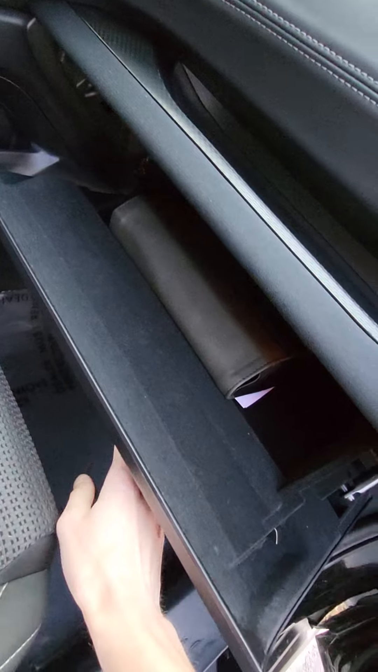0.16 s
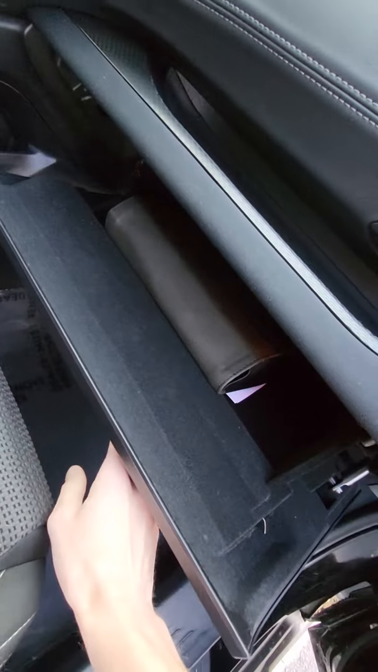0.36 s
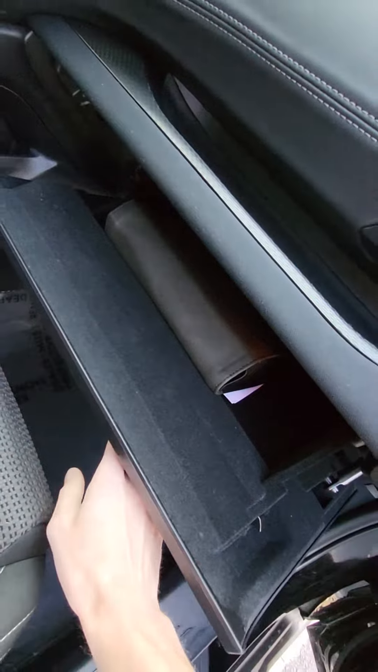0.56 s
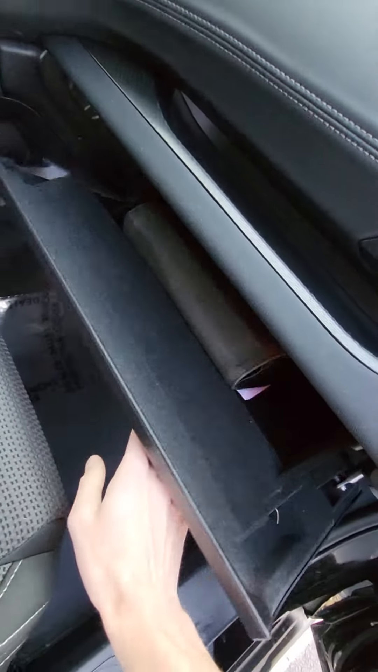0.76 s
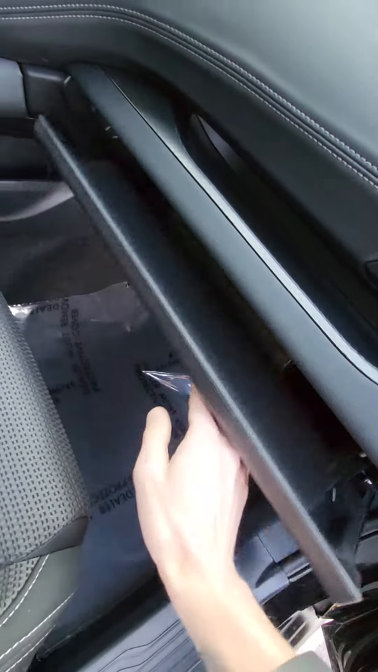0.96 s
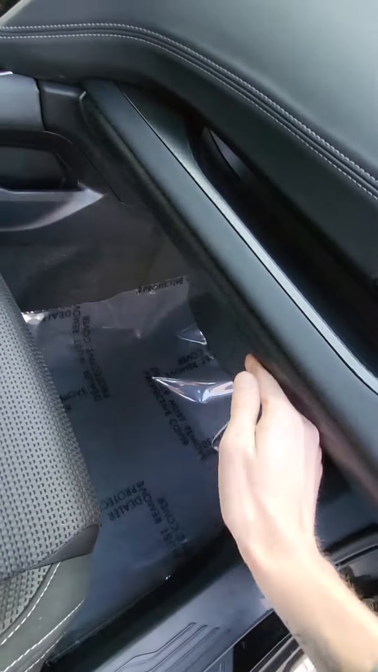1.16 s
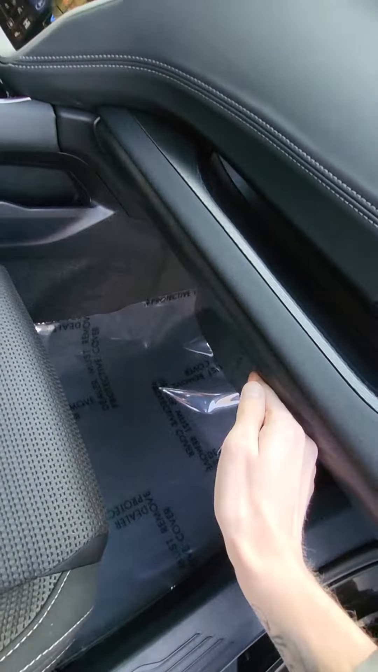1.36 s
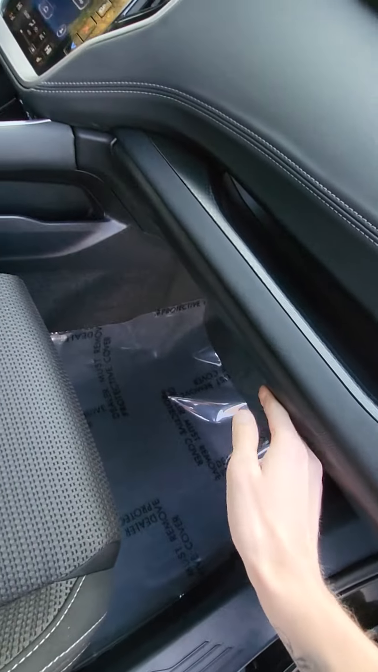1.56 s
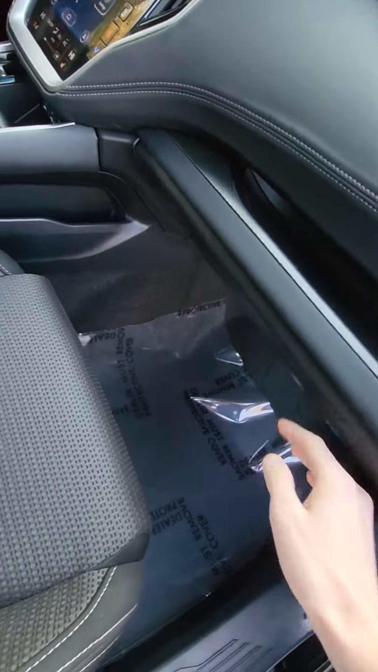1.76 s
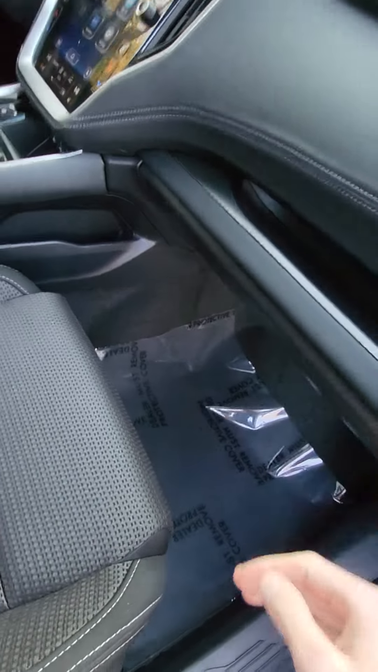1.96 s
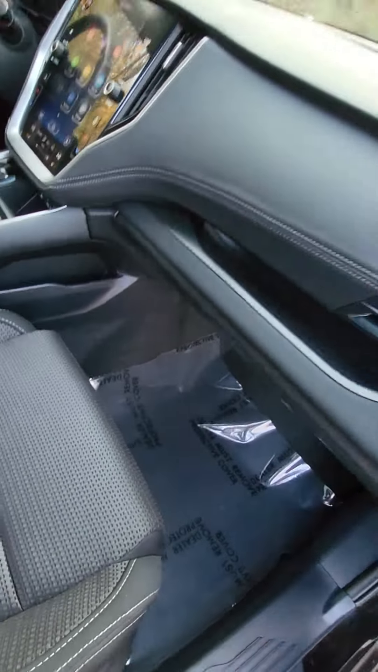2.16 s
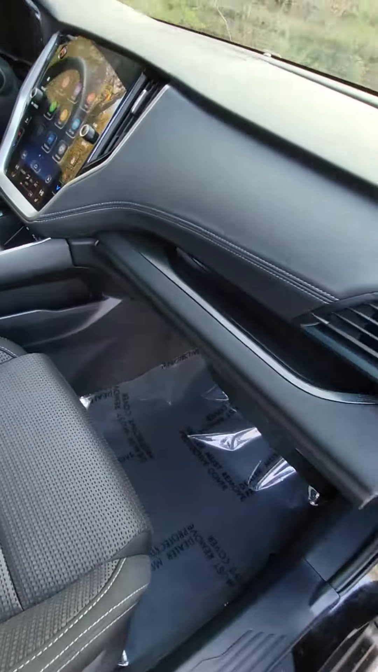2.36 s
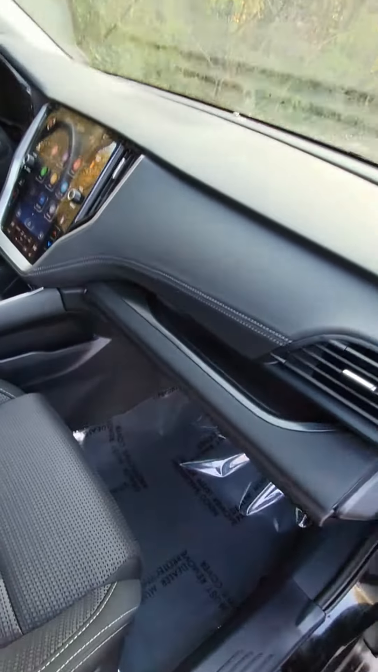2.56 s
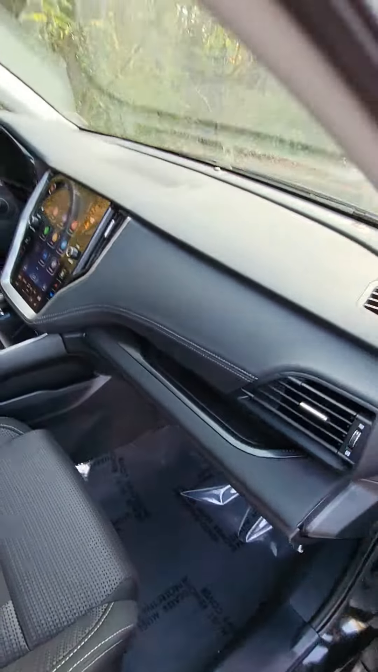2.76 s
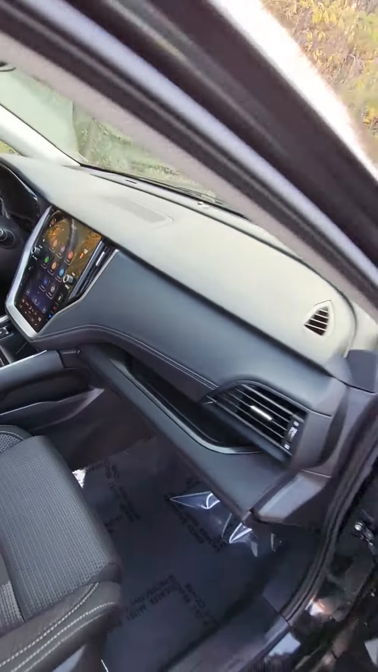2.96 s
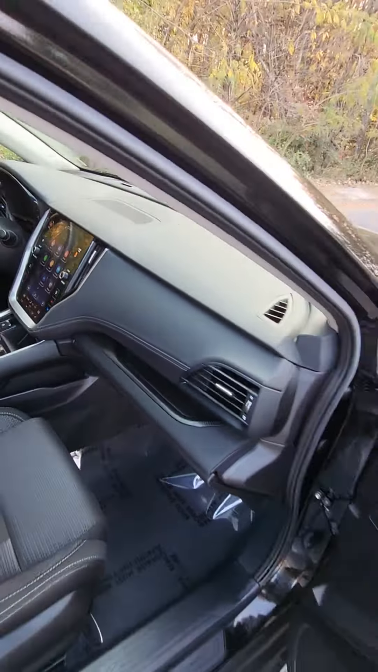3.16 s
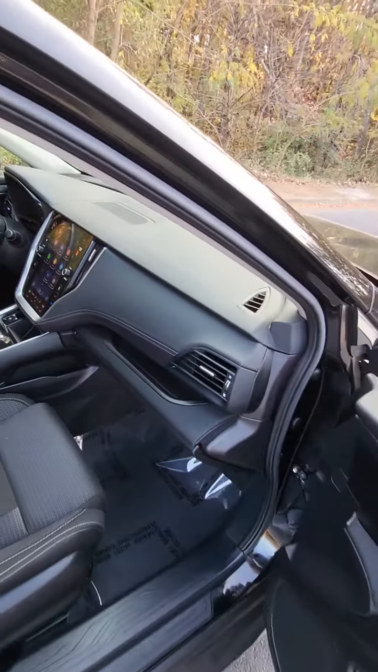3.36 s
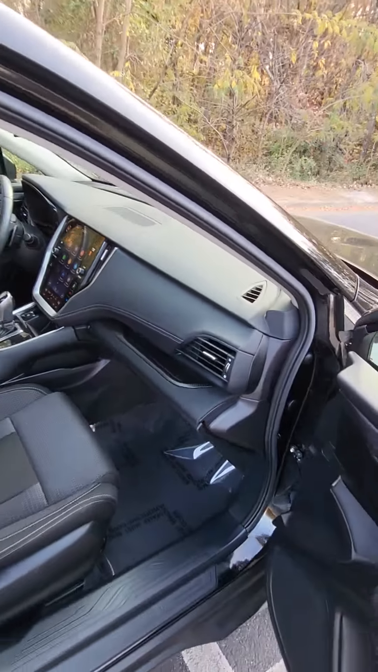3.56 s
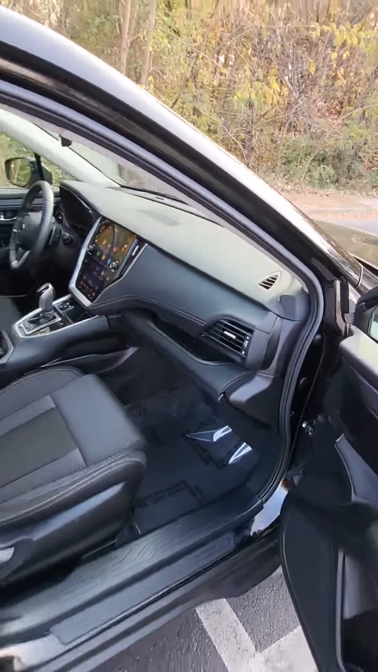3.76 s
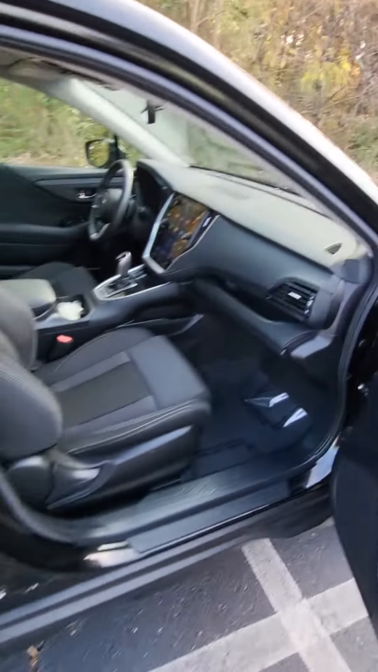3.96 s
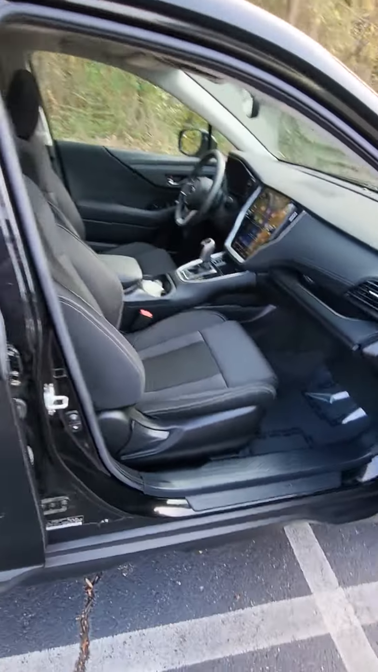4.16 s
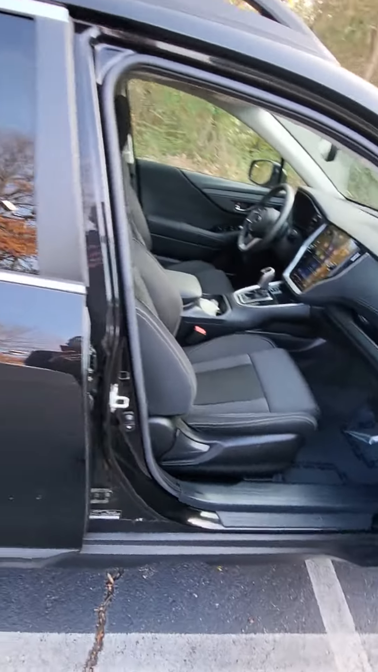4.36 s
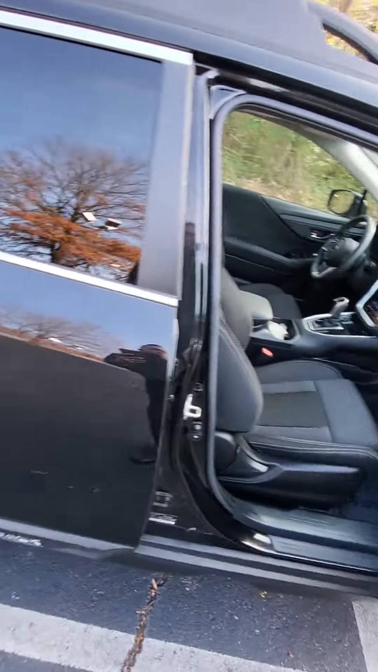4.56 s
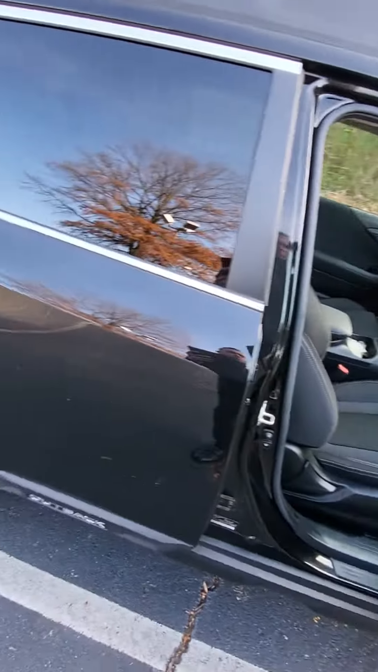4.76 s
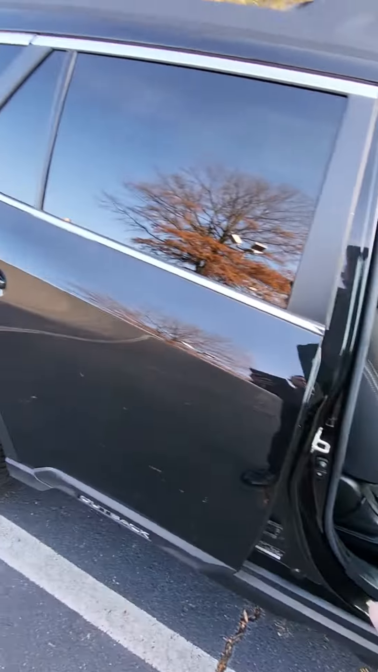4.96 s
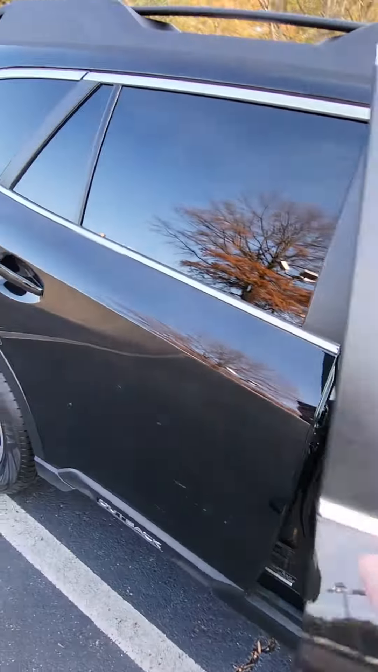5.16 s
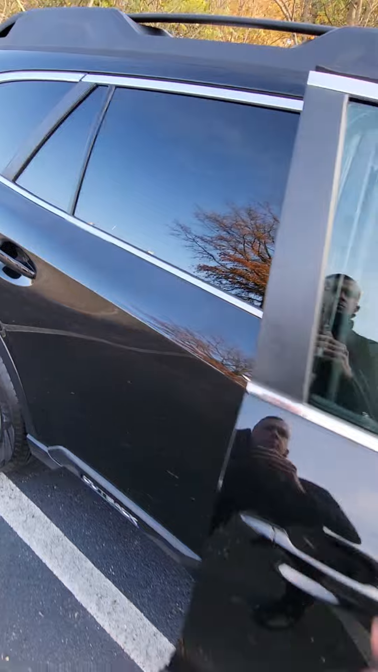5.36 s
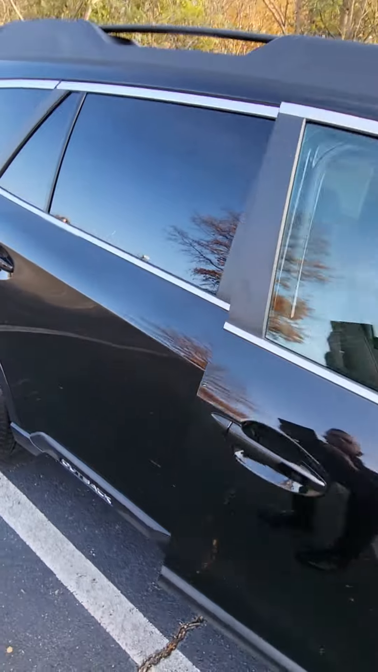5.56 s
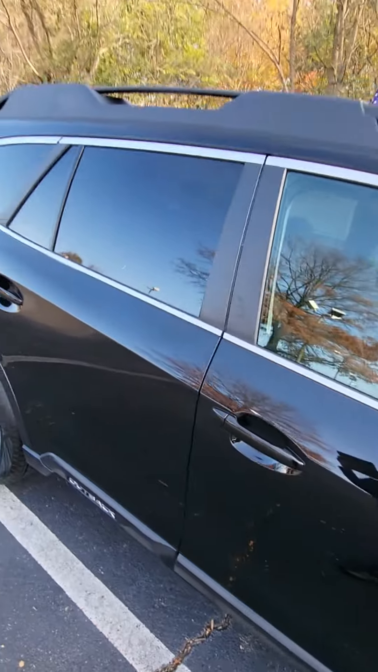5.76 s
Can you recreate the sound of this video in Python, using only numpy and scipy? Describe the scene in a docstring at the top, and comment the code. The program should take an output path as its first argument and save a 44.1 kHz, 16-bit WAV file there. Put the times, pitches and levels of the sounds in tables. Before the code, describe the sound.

Inside a parked car, the engine idles with a low, steady hum. Close by, a glove box lid is pushed shut with a sharp plastic click and clatter. Clothes rustle faintly with a few tiny ticks as the hand-held microphone backs out into the open air. The passenger door knocks softly on its hinge, then slams near the end with a loud, heavy thud.

```python
"""A low engine hum, heard from inside a parked car. Close by, the glove box lid is pushed shut: its latch
rides over the catch and the plastic clatters. The person steps back with rustling clothes; the passenger
door knocks over its hinge detents, then slams, its skin ringing, and rocks on its rubber seals.
The microphone is a hand-held phone with two ports, carried from the cabin out into the open air."""
import sys
import numpy as np
from scipy import signal
from scipy.fft import rfft, irfft, next_fast_len
from scipy.io import wavfile
from scipy.ndimage import uniform_filter1d

SR = 44100
rng = np.random.default_rng(int(sys.argv[2]) if len(sys.argv) > 2 else 0)


def to_wav(sig):
    """Store sig (one row per channel, or 1-D mono) as 16-bit WAV at the path in sys.argv[1].

    Samples outside -1..1 are clipped; the rate is SR.
    """
    pcm = np.clip(np.atleast_2d(sig), -1, 1) * 32767
    pcm = np.round(pcm).astype(np.int16)
    wavfile.write(sys.argv[1], SR, pcm.T)  # frames by channels


N = 256127
RING = 16384  # samples given to one blow
TIME, AGE = np.arange(N) / SR, np.arange(RING) / SR  # s into the scene, s into a blow
SIDES = np.array([[0.5], [-0.5]])  # left port, right port; every pan is left minus right


# Passenger door, a step or so away: detents, seal, latch, stop, a loose trim.
# t/s, rattle level/dB, skin level/dB, contact/ms, rattle treble tilt/(dB per octave)
DOOR_KNOCKS = [(3.5967, -46, -34, 1.3, -1), (3.619, -43.5, -30, 1.8, -12), (3.881, -35, -30, 1.2, -2),
               (5.649, -26.5, -33, 1, 0), (5.674, -17, -26, 0.92, 2), (5.68, -18.5, -8.5, 1.53, 6),
               (5.705, -24, -24, 1.5, 2.5), (5.7085, -33, -6.5, 3.5, 3), (5.743, -45, -23.5, 0.87, 11)]
# Its skin and trim: f/Hz, level/dB, t60/s, pan/dB
DOOR_SKIN_MODES = [(62.6, -29, 0.28, 4), (92.6, -15.5, 0.32, -4), (156.6, -10, 0.16, -1),
                   (211, -6, 0.065, 1), (274, -3, 0.061, -4), (328.2, -3, 0.091, -10),
                   (356.5, -2.5, 0.068, -10), (431.6, -9.5, 0.13, 0), (541, 0.5, 0.027, 11),
                   (700, -5, 0.02, 8), (723, -19, .06, -6), (862, -14.5, 0.13, 5), (1240, -12, 0.087, 1),
                   (2060, -15, .05, 0), (2710, -14, .05, 0)]
# Spectrum of the parts inside it: f/Hz, level/dB
DOOR_PARTS_SPECTRUM = [(60, -58), (200, 4), (350, 6.5), (750, 10.5), (1000, -9.5), (1250, -1),
                       (1600, -12.5), (2600, -18.5), (4300, -28.5), (6000, -29.5), (7900, -34),
                       (8800, -42.5), (16000, -46)]

def door():
    """Each blow rings the door skin and shakes the parts inside."""
    out = np.zeros((2, N))
    for s, rattle_db, skin_db, contact_ms, tilt_db in DOOR_KNOCKS:
        parts = noise(RING, DOOR_PARTS_SPECTRUM, diffuse=0.51, tilt_db=tilt_db)
        rattle = clatter(parts, rise_ms=0.78, low_t60=0.099, high_t60=0.12)
        skin = ring(DOOR_SKIN_MODES, contact_ms, rise_ms=0.94, lag_ms=-0.35)
        add(out, s, undb(rattle_db) * ports(rattle, lag_ms=0.368, pan_db=-2.5) + undb(skin_db) * skin)
    return out


def seal_thud():
    """The door bounces on its seals and shoves air at the microphone, each time later, softer, weaker."""
    out = np.zeros((2, N))
    s, first_gap_s = 5.711, 0.0255
    for bounce in range(4):
        contact_ms = 9 * 1.65 ** bounce
        shove = undb(-2.5 - 2 * bounce ** 2) * ports(push(contact_ms), lag_ms=-0.1, pan_db=-1.6)
        add(out, s - contact_ms / 2000, shove)  # peaks at s
        s += first_gap_s * 1.33 ** bounce
    # as the latch grabs, the skin flexes inwards and sucks air for a moment
    add(out, 5.680, -undb(-10) * ports(push(contact_ms=9), lag_ms=0.2, pan_db=-3))
    # slow pressure escapes round the door
    return signal.sosfilt(signal.butter(1, 12, "high", fs=SR, output="sos"), out)


# Glove box, close up in the cabin: catch, latch riding over it, stops, the hand letting go.
# t/s, clatter level/dB, lid level/dB, catch level/dB, contact/ms, clatter treble tilt/(dB per octave)
LID_KNOCKS = [(1.0803, -28, -42, -8, 0.33, 0.5), (1.092, -31, -19.5, -28, 1.6, -4),
              (1.1327, -25.5, -32, -37, 0.24, 1.5), (1.142, -25.5, -32, -16, 0.4, 2),
              (1.1533, -13, -18.5, -28, 0.16, 3.5), (1.1561, -17, -4, -13, 0.69, -2.5),
              (1.165, -38, -31, -17, 0.58, -4), (1.563, -66, -40, -67, 1.2, 0)]
# The plastic lid and its bin: f/Hz, level/dB, t60/s, pan/dB
LID_AND_BIN_MODES = [(104.5, -14, 0.23, -0.5), (181, -13, 0.075, -21.5), (239, -16, 0.11, -7),
                     (379, -16.5, 0.11, 3), (431.6, 5, 0.064, 6), (633, -10.5, 0.092, -13),
                     (852, -9.5, 0.066, -10), (1150, -29, .08, -5), (1358, 1, 0.047, 6),
                     (1480, -8, 0.044, 3), (1572, -18, 0.046, -5), (1860, -11.5, 0.089, -1),
                     (2190, -11, 0.14, -1), (2550, -16, 0.14, 8), (2970, -29, .06, 2),
                     (4295, -1, 0.052, -4)]
# The hollow catch: f/Hz, level/dB, t60/s, pan/dB
HOLLOW_CATCH_MODES = [(1124, -12, 0.038, 8), (1146, -13, 0.077, -2), (1283, -6.5, .035, -7),
                      (1850, -1.5, 0.025, -8), (1920, -0.5, 0.027, 8), (2290, 4, 0.028, 3),
                      (2586, 6.5, 0.028, 0), (3470, -6, 0.019, -9)]
# Spectrum of the latch and loose plastic: f/Hz, level/dB
PLASTIC_SPECTRUM = [(100, -29), (400, 5.5), (900, -1.5), (1300, -0.5), (1650, -1.5), (2300, -3),
                    (3200, -8.5), (4300, -14), (5000, -17.5), (7900, -17), (8700, -23.5), (10000, -26.5),
                    (16000, -32.5)]

def glove_box():
    """The latch knocks on its catch, rides over it and snaps home as the lid hits its stops."""
    out = np.zeros((2, N))
    for s, clatter_db, lid_db, catch_db, contact_ms, tilt_db in LID_KNOCKS:
        plastic = noise(RING, PLASTIC_SPECTRUM, diffuse=0.84, tilt_db=tilt_db)
        plastic = clatter(plastic, rise_ms=4.1 * contact_ms, low_t60=0.13, high_t60=0.061)
        plastic = ports(plastic, lag_ms=-0.016, pan_db=-1.5)
        lid = ring(LID_AND_BIN_MODES, contact_ms, rise_ms=5.5, lag_ms=-0.2)
        catch = ring(HOLLOW_CATCH_MODES, contact_ms=0.31, rise_ms=7.7, lag_ms=0.17)
        add(out, s, undb(clatter_db) * plastic + undb(lid_db) * lid + undb(catch_db) * catch)
    return out


# Small ticks on the way out, then the door latch meeting and gripping its striker.
# t/s, level/dB, resonance f/Hz, resonance height/dB, t60/s
HARD_CONTACTS = [(2.4715, -40, 3900, 16, 0.018), (4.5952, -33.5, 1780, 18.5, 0.021),
                 (5.5898, -36.5, 1310, 33, 0.032), (5.65, -36.5, 1570, 41, 0.1),
                 (5.679, -28, 1920, 28, 0.042), (5.683, -36, 6000, 12, .035),
                 (5.708, -34.5, 1230, 41, 0.063)]
# Hiss of a hard contact: f/Hz, level/dB
CONTACT_SPECTRUM = [(300, -13.5), (3000, 0.5), (4800, -4), (6200, 2), (7900, -1.5), (8800, -7), (12000, -2),
                    (16000, -3)]

def ticks():
    """Tiny hard contacts: a short hiss with a resonance and its overtone standing out."""
    out = np.zeros((2, N))
    grid_hz = np.geomspace(100, 16000, 120)
    hiss_db = np.interp(grid_hz, *np.transpose(CONTACT_SPECTRUM))
    for s, db, hz, peak_db, t60 in HARD_CONTACTS:
        peaks = resonance(grid_hz, hz, width=0.29) + 0.45 * resonance(grid_hz, 1.74 * hz, width=0.066)
        hiss = noise(RING, np.c_[grid_hz, hiss_db + peak_db * peaks], diffuse=1.0)
        add(out, s, undb(db) * clatter(hiss, rise_ms=1.0, low_t60=t60, high_t60=t60))
    return out


def engine():
    """Four cylinders idle; the firing rate steps up once under load, then sags back slowly."""
    firing_hz = 25.3 + 3.3 * ease(middle_s=4.83, length_s=0.62) - 2 * np.maximum(TIME - 5.3, 0)
    firings = np.cumsum(firing_hz * (1 + 0.0043 * walk(5.8))) / SR
    outside = openness()
    return exhaust_hum(firings, outside) + fan(outside) + injectors(firings, outside)


# Exhaust from two positions: multiple of the firing rate, level in the cabin/dB, level outside/dB
EXHAUST_HARMONICS = [(1, -43.5, -51.5), (2, -54.5, -49), (3, -44.5, -41.5), (4, -56, -53), (5, -57, -50),
                     (7, -61, -74), (9, -67, -61)]

def exhaust_hum(firings, outside):
    """Wavering harmonics of the firing rate, leaning right as the microphone leaves the cabin."""
    hum = 0
    for k, cabin_db, open_db in EXHAUST_HARMONICS:
        rms = undb(cabin_db + (open_db - cabin_db) * outside + 1.7 * walk(13))
        hum += rms * np.sqrt(2) * np.sin(2 * np.pi * (k * firings + rng.random()))
    pan_db = -2.5 * outside
    return ports(hum, lag_ms=0.44, pan_db=0) * undb(SIDES * pan_db)


# Fan, belts and exhaust gas, heard through the cabin: f/Hz, level/dB
FAN_CABIN_SPECTRUM = [(20, -42), (60, 5), (145, -8), (300, -17), (440, -14.5), (560, -21), (1350, -25.5),
                      (1650, -31.5), (3400, -36.5), (4400, -37.5), (5200, -47.5), (6000, -39),
                      (7900, -43.5), (8700, -49.5)]
# The same from beside the car, in the open: f/Hz, level/dB
FAN_OPEN_SPECTRUM = [(100, 0), (260, 6), (470, -5), (570, 1), (780, 5), (1040, -3.5), (1400, -3.5),
                     (1950, -10), (2200, -16), (3600, -13.5), (5100, -20), (7800, -14.5), (8600, -23.5),
                     (16000, -23.5)]

def fan(outside):
    """A muffled rush of fan, belts and gas; the brighter direct sound grows in the open air."""
    muffled = noise(N, FAN_CABIN_SPECTRUM, diffuse=0.65, tilt_db=-0.38)
    muffled = ports(muffled, lag_ms=0.411, pan_db=-4.0)[:, :N]
    direct = ports(noise(N, FAN_OPEN_SPECTRUM, diffuse=0.53), lag_ms=0.354, pan_db=-3.0)[:, :N]
    return (undb(-44.5) * muffled + undb(-50.5) * outside * direct) * undb(0.5 * walk(9))


def injectors(firings, outside):
    """One high tick per firing; each of the four injectors has its own loudness."""
    # f/Hz, level/dB
    ping = [(6000, -0.5), (7200, -10), (7700, 15), (8400, -29), (9200, -8), (9700, 7.5), (10600, -49)]
    injector_db = np.array([0, -7, -2, -5])[firings.astype(int) % 4]
    decay = np.exp(-(firings % 1) / 0.25)
    return noise(N, ping, diffuse=0.59)[:, :N] * decay * undb(injector_db - 66.0 + 11.2 * outside)


# Clothes near the microphone: fastest moment t/s, length/s, rub level/dB, sheen level/dB
CLOTH_STROKES = [(.78, 1, -65, -82), (1.37, 0.25, -67.5, -90), (3.0, 0.9, -60.5, -67),
                 (3.232, 0.35, -58, -63), (4.1, 0.27, -56, -65), (4.497, 0.49, -61, -67),
                 (4.893, 0.064, -70, -59)]
# Fabric on fabric: f/Hz, level/dB
RUB_SPECTRUM = [(300, -32), (1200, -1.5), (3300, -4.5), (5200, -9.5), (7500, -8), (8700, -14), (12000, -16),
                (16000, -28)]
# Its treble sheen: f/Hz, level/dB
SHEEN_SPECTRUM = [(4000, -12), (9000, -1), (11500, 3), (16000, -0.5)]

def clothes():
    """Fabric slides in strokes that swell and fade, with a grain of catching threads."""
    rub_power = (undb(-67.5) * openness()) ** 2  # the faint rub of walking in the open
    sheen_power = 0
    for s, length_s, rub_db, sheen_db in CLOTH_STROKES:
        speed = np.exp(-(2 * (TIME - s) / length_s) ** 2)
        rub_power += (undb(rub_db) * speed) ** 2
        sheen_power += (undb(sheen_db) * speed) ** 2
    rub = noise(N, RUB_SPECTRUM, diffuse=1.0)[:, :N] * np.sqrt(rub_power) * undb(1.5 * walk(330))
    sheen = noise(N, SHEEN_SPECTRUM, diffuse=0.88)[:, :N] * np.sqrt(sheen_power) * undb(1.9 * walk(400))
    return (rub + sheen) * undb(1.1 * walk(35))


# The microphone backs out of the cabin, then round the door: mid-move t/s, length/s, openness gained
MICROPHONE_MOVES = [(2.596, 1.7, 0.51), (4.6, 2.9, 0.32)]

def openness():
    """How much open air reaches the microphone: 0 is shut in, 1 is out in the open."""
    return 0.15 + sum(gained * ease(s, length_s) for s, length_s, gained in MICROPHONE_MOVES)


def ring(modes, contact_ms, rise_ms, lag_ms):
    """Modes swell and fade after a push; a longer contact leaves only the low ones."""
    body = sum(undb(db + SIDES * pan_db) * np.sin(2 * np.pi * hz * AGE) * fade(t60)
               for hz, db, t60, pan_db in modes)
    force = push(contact_ms)
    struck = signal.fftconvolve(body * swell(rise_ms), force[None] / force.sum())
    return ports(struck[:, :RING], lag_ms, pan_db=0)


def clatter(x, rise_ms, low_t60, high_t60):
    """Countless small modes: the noise builds up, then each octave dies away over its own t60."""
    octave = np.log2(np.clip(np.fft.rfftfreq(RING, 1 / SR), 125, 16000) / 125)
    spectrum, out = rfft(x), 0
    for k, t60 in enumerate(np.geomspace(low_t60, high_t60, 8)):
        band = np.maximum(1 - abs(octave - k), 0)
        out += irfft(spectrum * band) * fade(t60)
    return out * swell(rise_ms)


def noise(size, spectrum, diffuse, tilt_db=0):
    """Two-port coloured noise, rms 1; the diffuse share differs between the ports, except in the bass."""
    padded = next_fast_len(size, True)
    hz = np.fft.rfftfreq(padded, 1 / SR) + 1
    points_hz, db = np.transpose(spectrum)
    gain = undb(np.interp(np.log(hz), np.log(points_hz), db) + tilt_db * np.log2(1 + hz / 1500))
    white = rfft(rng.standard_normal((3, padded)))
    own_share = diffuse * hz ** 2 / (hz ** 2 + 350 ** 2)
    x = irfft(gain * (np.sqrt(1 - own_share) * white[0] + np.sqrt(own_share) * white[1:]), padded)
    return x / x.std()


def ports(x, lag_ms, pan_db):
    """A sound from the right reaches the left port later (lag > 0) and weaker (pan < 0)."""
    size = x.shape[-1]
    delay = np.exp(-2j * np.pi * np.fft.rfftfreq(size, 1 / SR) * SIDES * lag_ms / 1000)
    return irfft(rfft(x) * delay, size) * undb(SIDES * pan_db)


def push(contact_ms):
    """The force of one contact: a smooth hump of height 1."""
    return np.sin(np.pi * np.minimum(AGE * 1000 / contact_ms, 1)) ** 2


def swell(rise_ms):
    """A vibration builds up from 0 to 1."""
    return 1 - np.exp(-AGE * 1000 / rise_ms)


def fade(t60):
    """A vibration loses 60 dB in t60 seconds."""
    return np.exp(-np.log(1000) * AGE / t60)


def resonance(grid_hz, hz, width):
    """A bell of height 1 on a log-frequency axis."""
    return 1 / (1 + (np.log(grid_hz / hz) / width) ** 2)


def ease(middle_s, length_s):
    """A smooth change from 0 to 1."""
    return 0.5 + 0.5 * np.sin(np.pi * np.clip((TIME - middle_s) / length_s, -0.5, 0.5))


def walk(rate_hz):
    """Random drift with a spread near 1."""
    hold = int(SR / rate_hz)
    return uniform_filter1d(np.repeat(rng.standard_normal(N // hold + 1), hold), hold)[:N]


def undb(db):
    """Decibels to gain."""
    return 10 ** (np.asarray(db) / 20)


def add(out, s, sound):
    """Mix a short sound in at time s."""
    start = int(s * SR)
    out[:, start:start + sound.shape[1]] += sound[:, :N - start]


def scene():
    """Everything that reaches the two ports."""
    return glove_box() + door() + seal_thud() + ticks() + engine() + clothes()


def record(dry):
    """The phone drops the deepest bass, clips peaks at full scale and cuts the top."""
    low_cut = signal.butter(2, 14, "high", fs=SR, output="sos")
    high_cut = signal.ellip(10, 0.2, 80, 15900, fs=SR, output="sos")
    clipped = np.clip(signal.sosfilt(low_cut, dry), -1, 1)
    return signal.sosfilt(high_cut, clipped)


dry = scene()
out = record(dry)
to_wav(out)
```